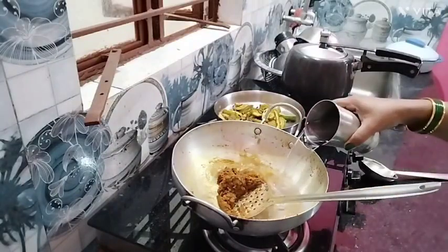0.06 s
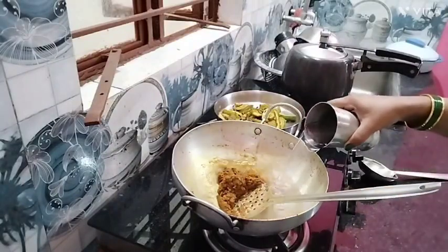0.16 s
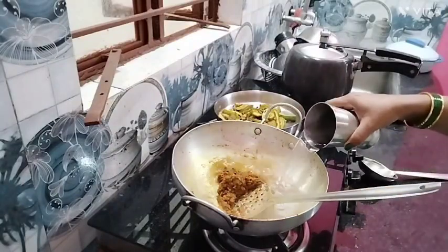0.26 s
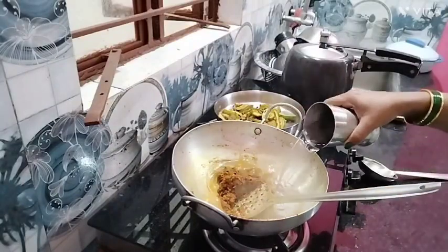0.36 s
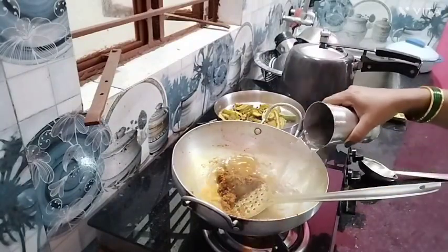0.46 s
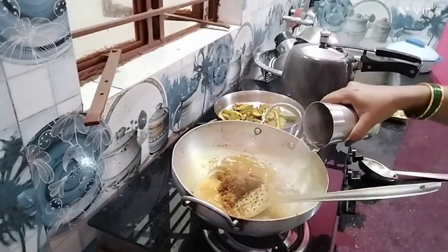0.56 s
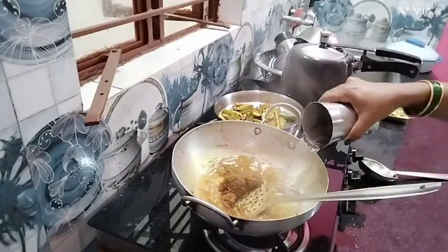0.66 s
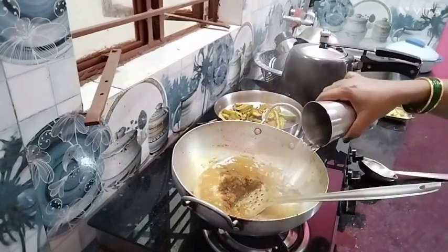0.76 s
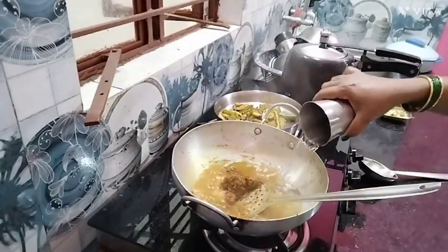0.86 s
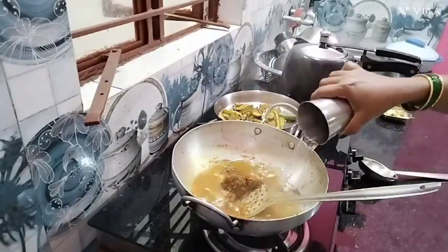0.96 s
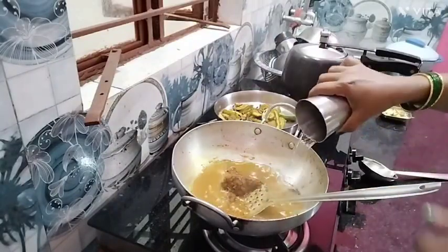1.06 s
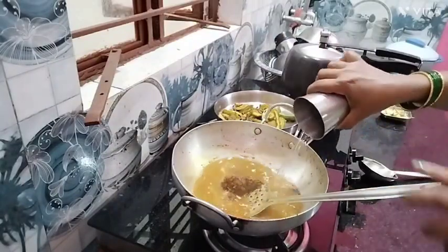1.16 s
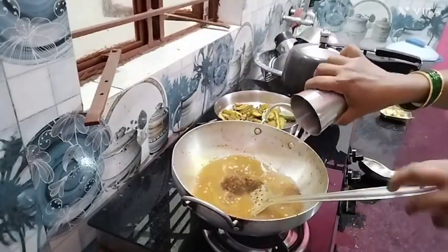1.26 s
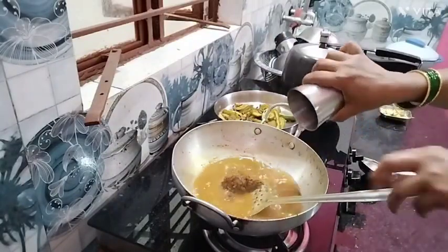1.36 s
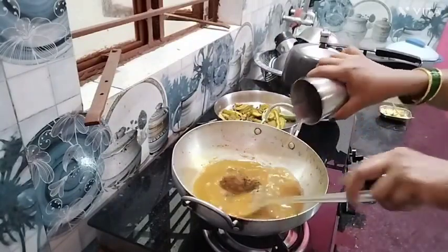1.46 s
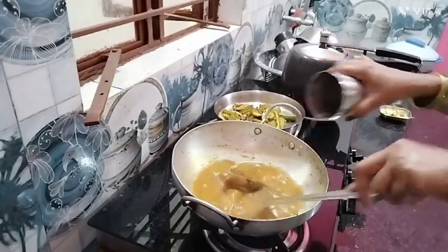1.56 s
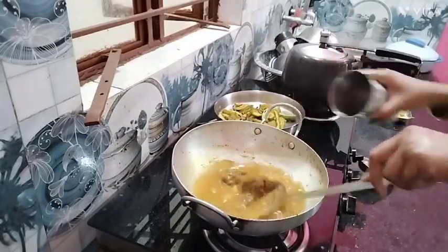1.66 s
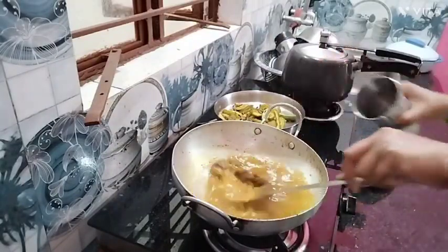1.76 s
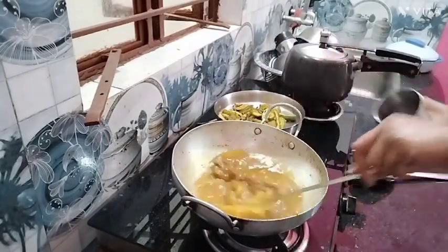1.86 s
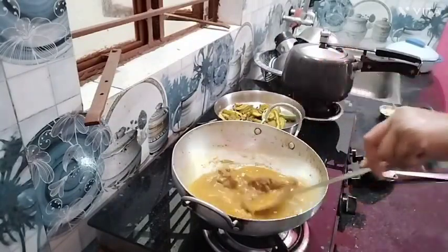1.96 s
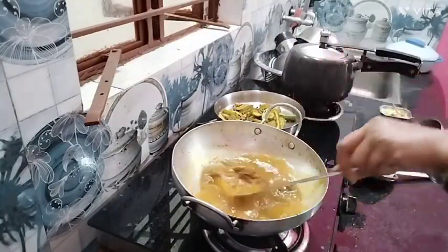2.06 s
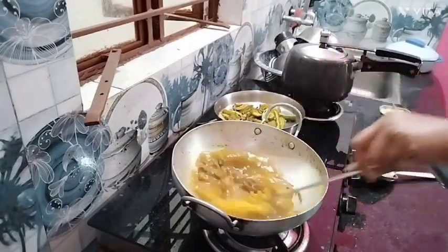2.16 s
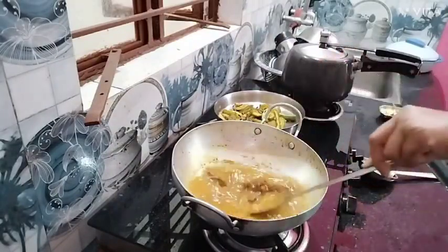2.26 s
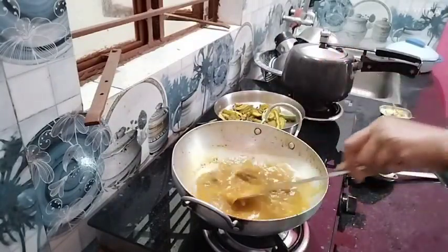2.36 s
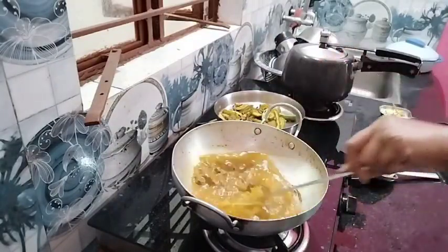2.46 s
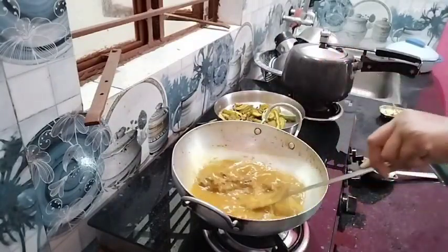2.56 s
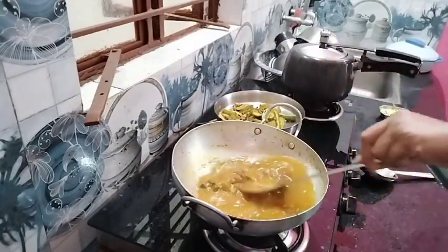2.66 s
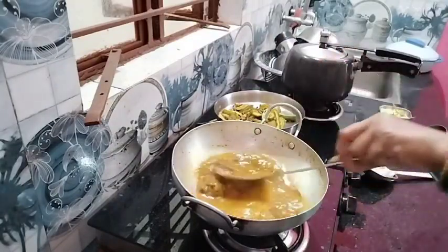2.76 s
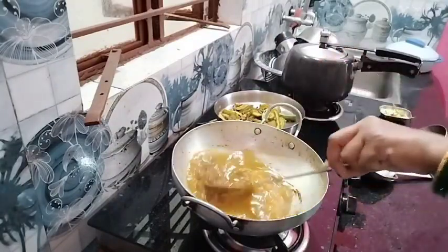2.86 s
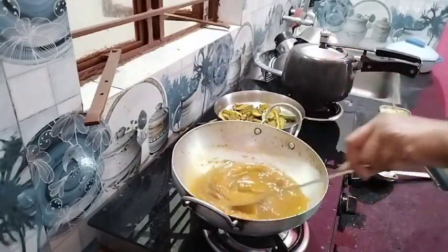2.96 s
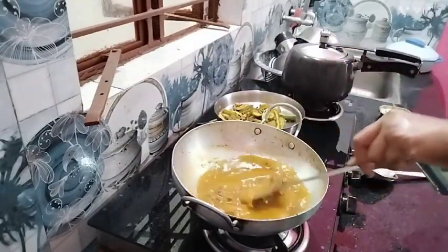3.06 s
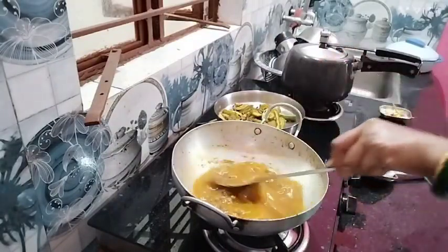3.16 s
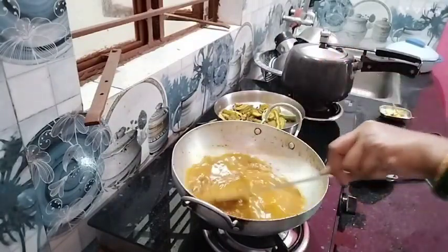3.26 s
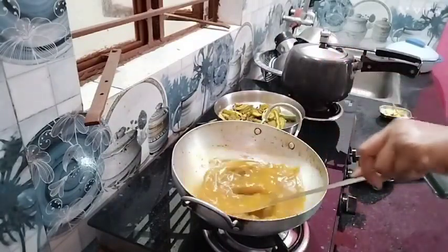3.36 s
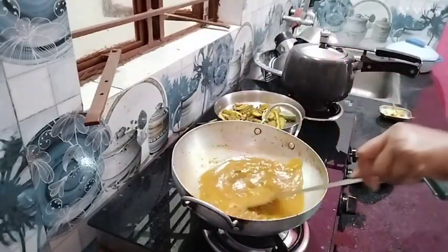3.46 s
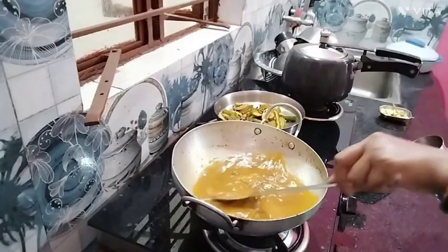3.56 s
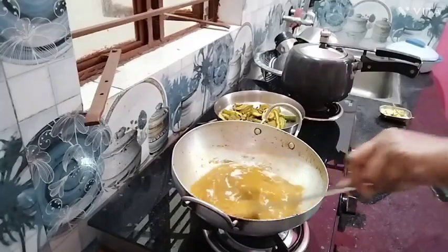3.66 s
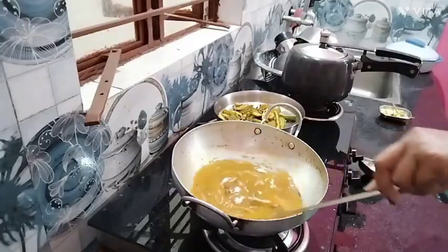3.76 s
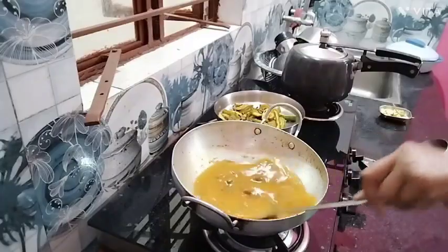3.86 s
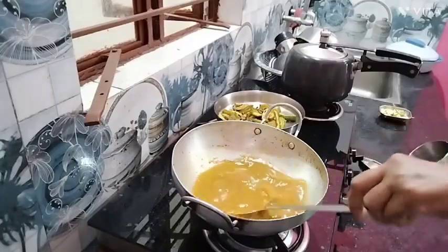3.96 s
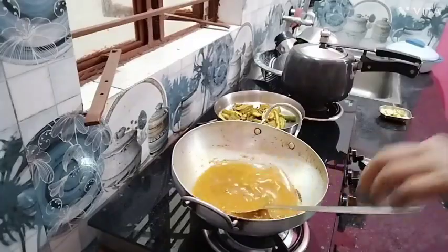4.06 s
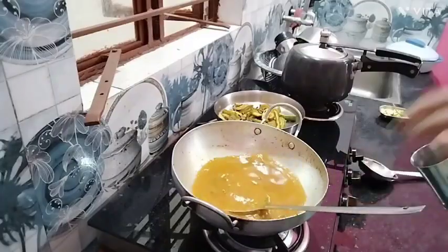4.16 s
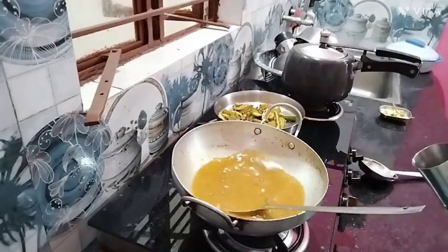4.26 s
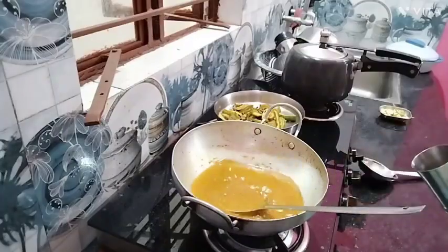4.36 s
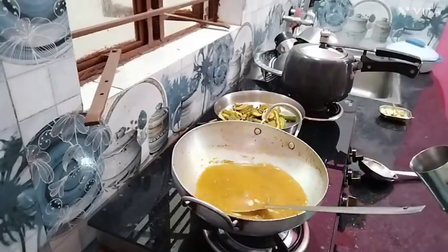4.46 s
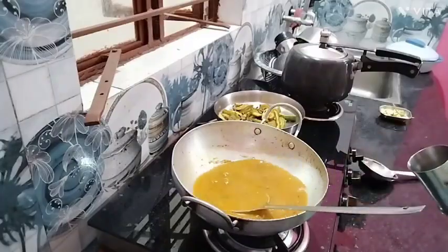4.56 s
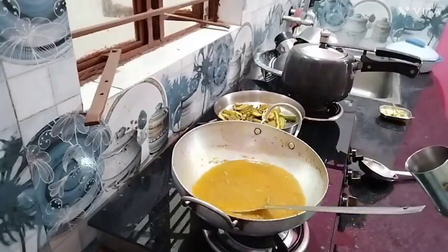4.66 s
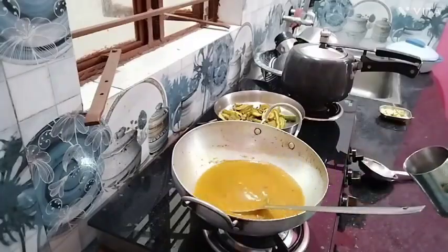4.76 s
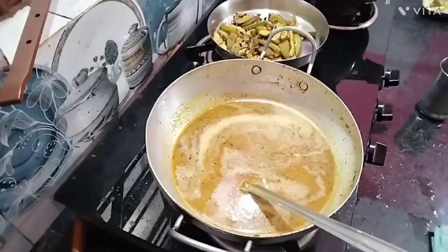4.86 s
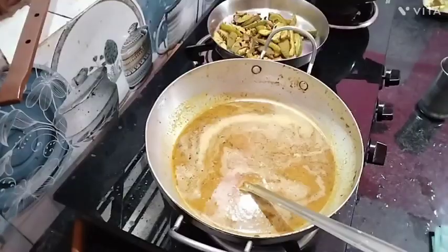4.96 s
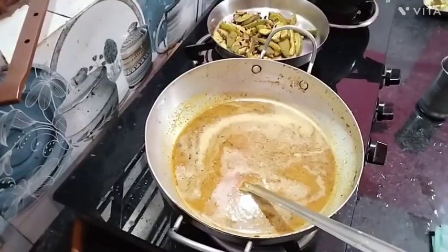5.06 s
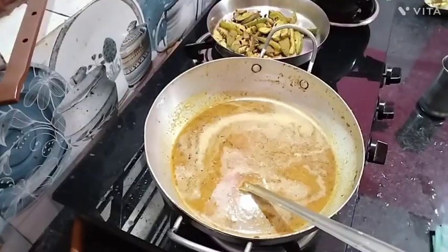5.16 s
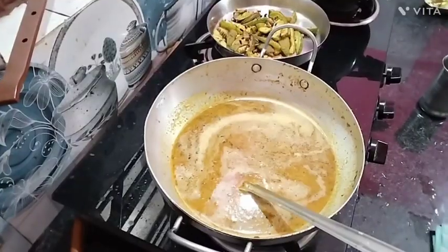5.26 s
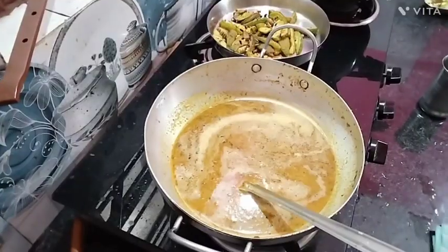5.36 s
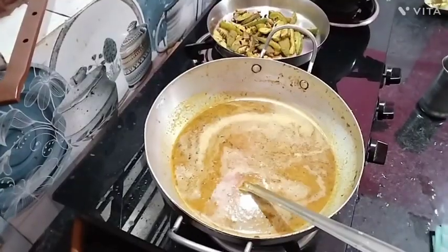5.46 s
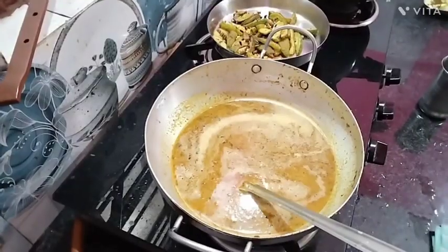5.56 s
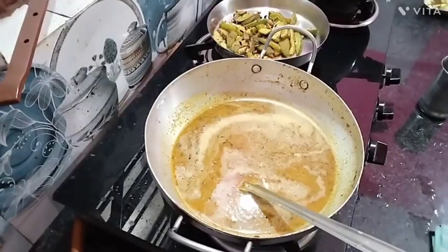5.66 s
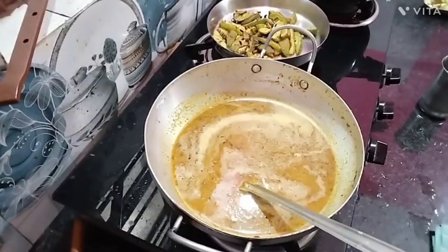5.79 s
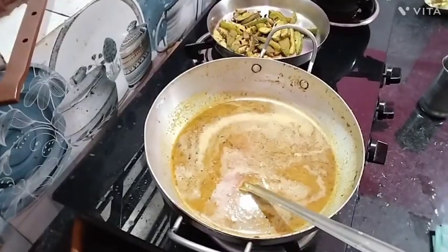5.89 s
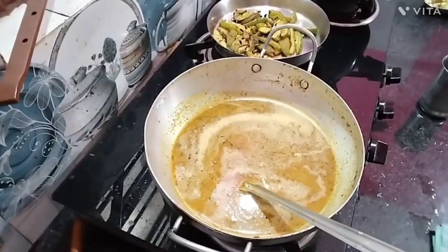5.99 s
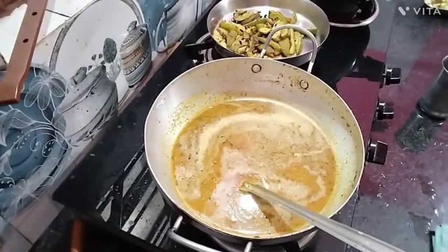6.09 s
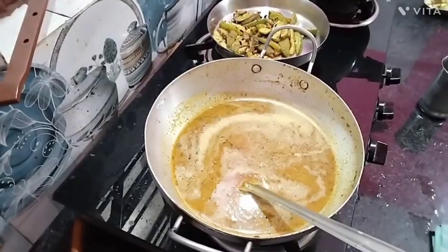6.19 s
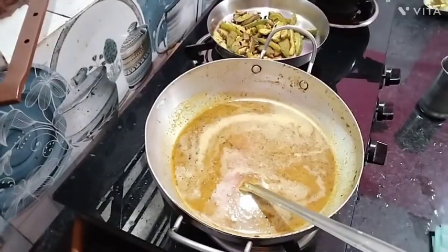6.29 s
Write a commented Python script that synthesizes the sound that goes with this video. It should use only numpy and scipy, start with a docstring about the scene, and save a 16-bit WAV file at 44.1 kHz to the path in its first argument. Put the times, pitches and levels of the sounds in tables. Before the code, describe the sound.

In a small tiled kitchen, water gushes onto fried spices in a hot metal pan with a loud, spitting sizzle that quickly drowns. A steel spoon then stirs the gravy with scrapes, plops and fresh hisses, and drops against the rim with a damped clank. Thin bubbling remains over flame rumble and faint hum; sound vanishes briefly, then returns. Close stereo microphone.

```python
"""Water is poured onto fried spices in a hot metal pan: countless vapour bursts make a loud sizzle that drowns as it fills.
A steel spoon stirs the gravy up the hot wall, where it hisses again, then is dropped against the rim: damped metal modes.
Bubbles sing thinly in a high band; short rings make plops, ticks and gurgles, and dull bumps and rumbles come from the pan.
The gas flame is shaped noise over a mains hum of two wavering tones, in a small tiled kitchen.
Near the end all sound cuts out for about 0.6 s."""
import sys
import numpy as np
from scipy import signal
from scipy.fft import rfft, irfft, next_fast_len
from scipy.io import wavfile

SR = 44100
rng = np.random.default_rng(int(sys.argv[2]) if len(sys.argv) > 2 else 0)


def dump(signal):
    """Clip the signal to [-1, 1] and save it as 16-bit WAV at the path in sys.argv[1]."""
    limited = np.clip(np.atleast_2d(signal).T, -1, 1)
    pcm = np.round(limited * 32767).astype(np.int16)
    wavfile.write(sys.argv[1], SR, pcm)


N = 279086
SIZE = next_fast_len(N, real=True)
TIME = np.arange(N) / SR                                        # s
BINS = np.maximum(np.arange(SIZE // 2 + 1) * SR / SIZE, 1)      # Hz

# how alike left and right are, high in the bass and where the pan itself rings:
# pitch_hz [Hz], likeness [-1 to 1]
LIKENESS = [(25, .7), (70, .96), (120, .98), (180, .8), (245, .88), (305, .6), (410, .8), (520, .45),
            (670, .55), (820, .1), (1200, -.1), (1700, .08), (2300, 0), (2700, .45), (3100, .08),
            (3550, .5), (4100, -.05), (5500, 0), (6650, 0), (7000, .72), (7350, .75), (7800, .2),
            (10500, .3), (15500, .15)]


def from_db(db):
    """Decibels to gain."""
    return 10 ** (np.asarray(db) / 20)


def rms_one(x):
    """Scale to an average strength (rms) of 1."""
    return x / np.sqrt(np.mean(x ** 2) + 1e-20)


def at_hz(points):
    """Read a table at every frequency, on a log axis."""
    hz, value = np.transpose(points)
    return np.interp(np.log(BINS), np.log(hz), value)


def shaped(x, gain):
    """Apply a gain per frequency."""
    return irfft(rfft(x, SIZE) * gain, SIZE)[..., :N]


def colour(x, spectrum, peaks=()):
    """Give a steady sound a broad spectrum with resonance peaks on it; rms 1."""
    db = at_hz(spectrum)
    for hz, width_hz, lift_db in peaks:
        db = db + lift_db / (1 + (2 * (BINS - hz) / width_hz) ** 2)
    return rms_one(shaped(x, from_db(db)))


def spread(pair):
    """Mix two unrelated sounds into left and right: alike in the bass, mostly more diffuse higher up."""
    alike = np.clip(at_hz(LIKENESS), -1, 1)
    mid, side = shaped(pair, np.sqrt([1 + alike, 1 - alike]))
    return np.array([mid + side, mid - side])


def butter(x, hz, kind, order=2):
    """Filter forward in time with a Butterworth filter."""
    sos = signal.butter(order, np.clip(hz, 10, .45 * SR), kind, fs=SR, output="sos")
    return signal.sosfilt(sos, x + 1e-18)


def drift(rate):
    """Smooth random wander of rms 1; a higher rate (Hz) wanders faster."""
    step = SR // 500
    pole = np.exp(-2 * np.pi * rate * step / SR)
    noise = rng.standard_normal(N // step + 502)
    slow = signal.lfilter([1], [1, -2 * pole, pole ** 2], noise)[500:]      # skip the settling
    return np.interp(np.arange(N) / step, np.arange(len(slow)), rms_one(slow))


def grains(per_s, spread_db):
    """Random clicks of uneven size and sign; rms 1."""
    sizes = from_db(spread_db * np.minimum(rng.exponential(1, N), 4))
    signs = rng.choice([-1, 1], N)
    return rms_one(sizes * signs * (rng.random(N) < per_s / SR))


def wide_grains(per_s, spread_db):
    """Two unrelated streams of clicks, spread over left and right."""
    return spread(np.array([grains(per_s, spread_db) for ear in range(2)]))


def dying(t, t60):
    """Envelope that starts at t = 0 and loses 60 dB in t60 (s)."""
    return (t >= 0) * from_db(-60 * np.clip(t / t60, 0, 4))


def burst(start_s, attack_s, hold_s, fall_db_per_s):
    """Envelope that swells smoothly to 1, holds and dies away."""
    age = TIME - start_s
    rise = np.sin(np.pi / 2 * np.clip(age / attack_s, 0, 1)) ** 2
    return rise * from_db(-fall_db_per_s * np.maximum(age - attack_s - hold_s, 0))


def swell(peak_s, half_s):
    """Bell-shaped envelope of a smooth movement."""
    return np.exp(-np.minimum(((TIME - peak_s) / half_s) ** 2, 20))


def kitchen(x, wet_db, wall_hz=9000):
    """Direct sound plus dense reflections off the tiles, which soften the treble above wall_hz."""
    t = TIME[:SR // 2]
    noise = butter(rng.standard_normal((2, len(t))), wall_hz, "low", order=1)
    tail = noise * dying(t - .003, t60=0.45)
    tail /= np.sqrt(np.sum(tail ** 2))
    echoes = signal.oaconvolve(x[None], tail, axes=1)[:, :N]
    return x + from_db(wet_db) * spread(echoes)


def boiling():
    """Strength of sizzle, fine spray and coarse boiling: each flares up and dies back to a simmer."""
    # liquid meets hot metal, four gushes from the cup, then four strokes of the spoon,
    # then a faint lingering fine hiss:
    # start_s [s], level_db [dB before the sizzle's gain], hold_s [s], fall_db_per_s [dB/s],
    # fine_db and coarse_db [dB relative to the sizzle]
    flares = [(-0.147, -31.5, 0.12, 24, -0.5, -3.5), (0.202, -36, 0.15, 48.5, -4.5, -3),
              (0.342, -36.5, 0.12, 51.5, -2, -8.5), (0.924, -53, 0.1, 27, 2, 1.5),
              (1.692, -42.5, 0.033, 74, -4, -7.5), (1.965, -38.5, 0.0041, 27, -1.5, -5),
              (2.647, -53, 0.027, 24.5, 2, -3), (3.0, -66, 0.11, 58, 6, 3),
              (3.723, -80.5, 0.16, 29.5, 9, -12)]
    # quiet simmer round the edge, sinking as the pan cools: time_s [s], level_db [dB before the sizzle's gain]
    simmer = [(0.8, -48), (1.65, -59), (3.4, -64.5), (3.8, -66.5), (4.6, -71), (5.4, -80)]
    # the sizzle flares quickly, the boiling takes longer, the spray comes first and lingers
    flare_s, build_s, spray_lead_s, spray_linger_s = 0.084, 0.28, 0.019, 0.03
    simmer_fine_db, simmer_coarse_db = -8.5, -3       # relative to the simmer

    time_s, level_db = np.transpose(simmer)
    simmering = from_db(np.interp(TIME, time_s, level_db))
    power = simmering ** 2 * from_db([[0], [simmer_fine_db], [simmer_coarse_db]]) ** 2
    for s, db, hold_s, fall, fine_db, coarse_db in flares:
        flare = from_db(db) * burst(s, flare_s, hold_s, fall)
        spray_shape = burst(s - spray_lead_s, flare_s + spray_lead_s, hold_s + spray_linger_s, fall)
        spray = from_db(db + fine_db) * spray_shape
        boil = from_db(coarse_db) * flare * np.sqrt(np.clip((TIME - s) / build_s, 0, 1))
        power += np.array([flare, spray, boil]) ** 2
    return np.sqrt(power)


def patches(x, depth_db, rate=16, count=12):
    """Each size of droplet comes and goes on its own, so bands swell and fade separately."""
    place = np.interp(np.sqrt(BINS), np.sqrt([1000, 15000]), [0, count - 1])
    spectrum = rfft(x, SIZE)
    out = 0
    for k in range(count):
        band = irfft(spectrum * np.maximum(1 - abs(place - k), 0), SIZE)[:, :N]
        out = out + band * from_db(depth_db * drift(rate))
    return out


def sizzle(strength, spray, boil, gain_db=3.0, flutter_db=.5, patchy_db=2.0):
    """Vapour bursts merge into a hiss, droplets spit; a thin film hisses high, deeper water boils lower."""
    # broad colour of the sizzle: pitch_hz [Hz], level_db [dB per Hz]
    sizzle_colour = [(120, -17.5), (220, -8), (380, -25), (520, -13.5), (850, -8.5), (1200, -4),
                     (2200, 1.1), (3300, -6), (4600, -2.5), (6200, -2), (7600, -1), (8900, -8),
                     (11200, -4.5), (15500, -4.5)]
    # resonances that change its colour: pitch_hz [Hz], width_hz [Hz], lift_db [dB]
    sizzle_peaks = [(854, 120, 10), (2750, 76, 1.5), (3366, 640, 6), (3765, 190, 4), (5050, 70, -0.5),
                    (6100, 60, 2), (7000, 450, 1.5), (11060, 1100, 3)]
    bursts_per_s, spits_per_s, spit_db = 9000, 200, -8
    boil_hz, spray_hz = 4200, 8300

    bursts = wide_grains(bursts_per_s, spread_db=1.0)
    sparse = np.interp(strength, from_db([-42, -34]), [1, .5])      # single spits drown in the full roar
    spits = from_db(spit_db) * sparse * grains(spits_per_s, spread_db=-0.5)
    centre = grains(bursts_per_s, spread_db=2) + spits
    hot_spot = rms_one(kitchen(centre, wet_db=8, wall_hz=16000))
    hiss = colour(patches(bursts + hot_spot, patchy_db), sizzle_colour, sizzle_peaks)

    fine = 1 / (1 + (spray_hz / BINS) ** 16)      # share of the smallest droplets
    coarse = 1 / (1 + (BINS / boil_hz) ** 8)      # share of the largest bubbles
    middle_part = strength * rms_one(shaped(hiss, 1 - fine - coarse))
    fine_part = spray * rms_one(shaped(hiss, fine))
    coarse_part = boil * rms_one(shaped(hiss, coarse))
    return (middle_part + fine_part + coarse_part) * from_db(gain_db + flutter_db * drift(55))


def surge(peak_s=0.307, half_s=0.06, level_db=-34, pitch_hz=3300, width_hz=1000):
    """As the second gush lands, the boiling briefly swells around one pitch."""
    boil = wide_grains(5000, spread_db=2)
    band = rms_one(butter(boil, [pitch_hz - width_hz / 2, pitch_hz + width_hz / 2], "band"))
    return band * from_db(level_db) * swell(peak_s, half_s)


def crackle(strength, per_s=110, level_db=-11, cycles=30, low_hz=2400, high_hz=12000, count=16):
    """Lone droplets pop on the hot wall at scattered pitches; they stand out once the roar has sunk."""
    t = TIME[:SR // 50]
    pops = 0
    for hz in np.geomspace(low_hz, high_hz, count):
        pop = np.sin(2 * np.pi * hz * t) * dying(t, cycles / hz)
        pops = pops + signal.oaconvolve(grains(per_s / count, spread_db=1.5), pop)[:N]
    limited = np.minimum(strength, from_db(-35.0))      # no louder in the full roar
    return kitchen(rms_one(pops) * limited * from_db(level_db), wet_db=-7)


def gurgle(boil, per_s=70, level_db=-16, cycles=22, low_hz=480, high_hz=2200, count=12):
    """Air and steam caught in the liquid ring as small bubbles, more loudly while it boils hard."""
    t = TIME[:SR // 10]
    rings = 0
    for hz in np.geomspace(low_hz, high_hz, count):
        bubble = np.sin(2 * np.pi * hz * t * (1 + 0.55 * t)) * dying(t, cycles / hz)      # pitch rises
        rings = rings + signal.oaconvolve(grains(per_s / count, spread_db=-1.5), bubble)[:N]
    return kitchen(rms_one(rings) * boil * from_db(level_db), wet_db=0.5)


def singing(gain_db=1, flutter_db=2.0, width_hz=230):
    """Like-sized bubbles collapse on the pan floor in a high band; swarms grow fast and thin out slowly."""
    # swarms of tiny vapour bubbles: peak_s [s], level_db [dB before the gain],
    # pitch_hz, pitch raised or lowered in level [Hz], lift_db, change at that pitch [dB]
    swarms = [(3.25, -57.5, 7250, -3), (3.87, -60.5, 7000, 6), (4.23, -62.5, 7120, 2),
              (4.49, -77, 7000, 11), (4.57, -50.5, 7060, 13), (5.53, -60, 6600, 0.5), (5.85, -65, 6750, 5),
              (6.16, -59, 6500, 1)]
    # colour of the swarms: pitch_hz [Hz], level_db [dB per Hz]
    singing_colour = [(5000, -39.5), (5800, -32), (6200, -9), (6600, -5), (6880, -2), (7060, -2),
                      (7250, -4), (7600, -24.5), (8100, -17), (8700, -60), (12000, -65)]
    rise_db_per_s, fall_db_per_s = 155, 65
    # once the gravy is warm, a faint singing goes on between the swarms
    warm_s, warming_s, bed_db = 2.5, 0.45, -72.5

    swarm = wide_grains(15000, spread_db=2)
    warmth = np.clip((TIME - warm_s) / warming_s, 0, 1)
    out = colour(swarm, singing_colour) * from_db(bed_db) * warmth
    for s, db, hz, lift_db in swarms:
        bubbles = np.roll(swarm, rng.integers(N), axis=1)
        drop_db = np.maximum(rise_db_per_s * (s - TIME), fall_db_per_s * (TIME - s))
        sung = colour(bubbles, singing_colour, [(hz, width_hz, lift_db)])
        out = out + sung * from_db(db - drop_db)
    return out * from_db(gain_db + flutter_db * drift(24))


def stirring():
    """How hard the spoon rasps and how strongly its bowl rings; both swell and fade with each stroke."""
    # strokes over the pan floor: peak_s [s], half_s, half length [s],
    # rasp_db [dB], ring_db of the bowl [dB before the level of each resonance]
    strokes = [(1.805, 0.26, -57.5, -57), (2.6, 0.94, -69, -72), (3.17, 0.32, -78, -57),
               (3.52, 0.066, -71, -60.5), (3.824, 0.048, -58, -82), (4.06, 0.064, -74, -80.5)]
    return sum(from_db([[rasp_db], [ring_db]]) * swell(s, half_s) for s, half_s, rasp_db, ring_db in strokes)


def pan_ring(bright_hz, damping, split=0.02, count=5):
    """One contact: a crack and clusters of beating modes, shortened by gravy and roughened by spoon chatter."""
    # modes of spoon and pan: pitch_hz, centre of the cluster [Hz], level_db [dB, relative],
    # t60_s, time to lose 60 dB before the gravy damps it [s]
    pan_modes = [(443, 16.5, 0.32), (728, 6, .2), (1320, -1.5, 0.21), (2077, 0, 0.41), (2180, -1, 0.25),
                 (2295, -2.5, 0.23), (2440, 0.5, .15), (3310, 5, 0.088), (3540, -3, 0.081),
                 (3830, -1, 0.098), (4270, -7, 0.15), (5370, -0.5, .18), (5830, 3.5, 0.21), (6150, 4, 0.16),
                 (6100, -11, .18), (6910, -0.5, 0.15), (7130, -3, 0.15), (7340, 2.5, 0.19),
                 (8000, 2, 0.079), (10800, -1, .08)]
    crack_db, crack_t60, chatter_db, chatter_t60 = -16, 0.009, -26, 0.036      # dB, s, dB, s
    t = TIME[:SR // 2]

    hz, db, t60 = np.repeat(pan_modes, count, axis=0).T[:, :, None]
    places = np.tile(np.linspace(-1, 1, count), len(pan_modes))[:, None]
    hz = hz * (1 + split * (places + rng.uniform(-0.82, 1, hz.shape) / count))
    favour = 1 / (1 + np.log2(hz / bright_hz) ** 2)      # pitches near bright_hz ring most
    strength = from_db(db + rng.normal(0, 1, hz.shape)) * favour / np.sqrt(count)
    waves = np.sin(2 * np.pi * hz * t) * rng.choice([-1, 1], hz.shape)
    modes = strength * waves * dying(t, t60 * np.clip(1 - damping, .025, 1))

    chatter = from_db(chatter_db) * rng.standard_normal(len(t)) * dying(t, chatter_t60)
    contact = (t == 0) + chatter
    ring = signal.fftconvolve(modes.sum(axis=0), contact)[:len(t)]
    crack_noise = butter(rng.standard_normal(len(t)), [bright_hz / 0.92, bright_hz * 2.5], "band")
    crack = rms_one(crack_noise) * dying(t, crack_t60)
    return from_db(-15.5) * ring + from_db(crack_db) * crack


def spoon(rasping, slips_per_s=2600, uneven_db=2, snap_hz=5000, snap_t60=0.0257, wet_db=-2):
    """The spoon knocks on the pan with a bright snap of bare metal, and rasps over its floor in quick slips."""
    # spoon on pan: start_s [s], level_db [dB], bright_hz, brightest pitch [Hz],
    # damping by the gravy [0-1], snap_db of bare metal [dB relative to the knock]
    knocks = [(2.598, -33.5, 3000, 0.93, -30), (3.041, -36.5, 5000, 0.95, -24),
              (3.382, -47, 5500, 0.93, -25), (3.514, -44, 4500, 0.73, -18), (3.58, -47, 3580, 0.6, -24),
              (3.699, -27, 1820, 1, -27), (3.7886, -30, 3730, 0.91, -26.5),
              (4.001, -20.5, 3300, 0.84, -21.5), (4.006, -30.5, 2300, 0.55, -24),
              (4.021, -41.5, 5500, 0.9, -24), (4.035, -31.5, 4020, 0.91, -18)]
    # colour of the rasp: pitch_hz [Hz], level_db [dB per Hz]
    rasp_colour = [(200, -13), (500, -2), (1200, 4), (2600, -5), (4500, -5.5), (7500, -8.5), (9000, -20),
                   (15000, -20)]
    out, t = np.zeros(N), TIME[:SR // 2]
    for s, db, bright_hz, damping, snap_db in knocks:
        snap = rms_one(butter(rng.standard_normal(len(t)), snap_hz, "high", order=1)) * dying(t, snap_t60)
        at = round(s * SR)
        out[at:at + len(t)] += from_db(db) * (pan_ring(bright_hz, damping) + from_db(snap_db) * snap)
    rasp = colour(grains(slips_per_s, spread_db=4.5), rasp_colour)
    out += rasp * rasping * from_db(uneven_db * drift(7.1))
    return kitchen(out, wet_db)


def rubbing(ringing, flicker_db=4.0):
    """Uneven friction keeps two resonances of the spoon's bowl alive."""
    # resonances of the bowl: pitch_hz [Hz], width_hz [Hz], level_db [dB, relative]
    rub_modes = [(3815, 350, -8.5), (10900, 400, -6.5)]
    friction = wide_grains(500, spread_db=3)
    rings = 0
    for hz, width_hz, db in rub_modes:
        band = rms_one(butter(friction, [hz - width_hz / 2, hz + width_hz / 2], "band"))
        rings = rings + band * from_db(db + flicker_db * drift(25))
    return rings * ringing


def plops(cycles=40, rise_per_s=0.52, attack_s=0.0017, snap_db=-14, snap_t60=0.038):
    """Low plops and high ticks: each is a snap of noise with a brief ring that rises in pitch."""
    # short ringing plops and high ticks: start_s [s], level_db of the ring before it dies [dB],
    # pitch_hz at the start [Hz]
    plops_and_ticks = [(1.625, -34, 993), (2.283, -26, 3430), (2.588, -38, 3070), (2.598, -44, 1700),
                       (3.030, -42, 8400), (3.074, -32, 8160), (3.170, -30, 5350), (3.381, -41, 1530),
                       (3.513, -39, 11100), (3.699, -38, 1020), (3.704, -40.5, 1220), (3.722, -43, 1110),
                       (3.974, -47, 3680), (4.235, -48, 10600)]
    out, t = np.zeros(N), TIME[:SR // 5]
    for s, db, hz in plops_and_ticks:
        wave = np.sin(2 * np.pi * hz * t * (1 + rise_per_s * t))      # pitch climbs at twice rise_per_s
        ring = wave * dying(t, attack_s + cycles / hz) * np.minimum(t / attack_s, 1)
        snap_noise = butter(rng.standard_normal(len(t)), [hz / 1.3, hz * 1.2], "band")
        snap = rms_one(snap_noise) * dying(t, snap_t60)
        at = round(s * SR)
        out[at:at + len(t)] += from_db(db) * (ring + from_db(snap_db) * snap)
    return kitchen(out, wet_db=-6)


def bumps(low_hz=95, rise_s=0.0029, slap_db=-24, thud_db=4, thud_cycles=5, thud_top_hz=170, body_t60=0.069):
    """Soft blows thud and shake the many low modes of pan and stove, with a faint slap above them."""
    # dull bumps of pan and stove: start_s [s], level_db [dB], edge_hz, upper edge of the body [Hz]
    blows = [(0.592, -31, 250), (0.718, -31.5, 142), (1.447, -30.5, 160), (1.583, -33, 155),
             (1.62, -36.5, 172), (2.472, -31, 173.4), (2.558, -34, 200), (3.516, -38.5, 200),
             (3.831, -33, 213), (4.003, -46, 520), (4.04, -34.5, 630), (4.5, -26.5, 165)]
    out, t = np.zeros(N), TIME[:SR // 2]
    for s, db, edge_hz in blows:
        push = butter(rng.standard_normal(SR), low_hz, "high")
        slap = from_db(slap_db) * butter(push, edge_hz * 4.1, "low")
        body = butter(push, edge_hz, "low", order=6) + slap
        shake = rms_one(body[-len(t):]) * dying(t, body_t60)
        thud_hz = min(0.69 * edge_hz, thud_top_hz)
        thud = from_db(thud_db) * np.sin(2 * np.pi * thud_hz * t) * dying(t, thud_cycles / thud_hz)
        hit = from_db(db) * (thud + shake) * (1 - np.exp(-t / rise_s))
        at = round(s * SR)
        out[at:at + len(t)] += hit[:N - at]
    return kitchen(out, wet_db=-6.0)


def rocking():
    """Stirred gravy rocks the pan with a low rumble; the first shove makes it judder in uneven knocks."""
    # the gravy sloshes: peak_s [s], level_db [dB]
    sloshes = [(2.62, -43), (2.98, -41), (3.35, -45.5), (3.98, -43.5), (4.51, -44), (6.182, -44.5)]
    # colours of the rumble and of the shove: pitch_hz [Hz], level_db [dB per Hz]
    rocking_colour = [(20, -4), (45, -10.5), (85, 10.5), (125, -12), (200, -28), (600, -72)]
    shove_colour = [(60, -17.5), (130, 11), (200, -9), (320, 2.5), (600, -14.5), (1050, -16.5),
                    (1400, -20.5), (2800, -22.5), (6000, -46)]
    # resonances that the shove excites: pitch_hz [Hz], width_hz [Hz], lift_db [dB]
    shove_peaks = [(950, 165, 7.5), (1700, 300, 3.5), (2710, 220, 3.5)]
    shove_db, knocks_per_s = -35.5, 840

    churn = spread(rng.standard_normal((2, N)))
    sloshing = sum(from_db(db) * swell(s, half_s=0.19) for s, db in sloshes)
    rumble = colour(churn, rocking_colour) * sloshing
    judder = kitchen(grains(knocks_per_s, spread_db=1.5), wet_db=-0.5)
    push = from_db(shove_db) * burst(start_s=1.545, attack_s=0.084, hold_s=0.015, fall_db_per_s=114)
    return rumble + colour(judder, shove_colour, shove_peaks) * push


def flame(level_db=-44.0, flicker_db=0.96):
    """Turbulent rumble of the burner: shaped noise whose level flickers."""
    # colour of the gas flame: pitch_hz [Hz], level_db [dB per Hz]
    flame_colour = [(20, -7), (40, -14.5), (62, -5), (84, 4), (108, -4), (135, -2), (195, -14.5),
                    (430, -10.5), (900, -16), (1300, -22), (2500, -30.5), (5000, -49.5), (9000, -66.5),
                    (15800, -66.5)]
    # room resonances it fills: pitch_hz [Hz], width_hz [Hz], lift_db [dB]
    room_peaks = [(118, 81, 4.8), (248.2, 20, 11.2), (293.7, 12, 6.7), (475, 42, 0.87), (924, 100, 4.9)]
    roar = colour(spread(rng.standard_normal((2, N))), flame_colour, room_peaks)
    return roar * from_db(level_db + flicker_db * drift(rate=20.0))


def hum(waver_db=2.0, waver_rad=0.3):
    """A slightly wavering mains hum."""
    # tones of the hum: pitch_hz [Hz], level_db [dB rms before the waver]
    hum_tones = [(100, -44.5), (300, -60)]
    phase = waver_rad * drift(rate=2.1)
    out = 0
    for hz, db in hum_tones:
        level = np.sqrt(2) * from_db(db + waver_db * drift(2.7))
        out = out + level * np.sin(2 * np.pi * hz * TIME + phase)
    return out


def scene():
    """Everything at the stove."""
    strength, spray, boil = boiling()
    rasping, ringing = stirring()
    water = sizzle(strength, spray, boil) + surge() + crackle(strength) + gurgle(boil) + singing()
    stirred = spoon(rasping) + rubbing(ringing) + plops() + bumps() + rocking()
    return water + stirred + flame() + hum()


def record(dry):
    """Left and right differ slightly in tone, the sound drops out once, and the top is cut."""
    # the two microphone ports hear the stove differently: pitch_hz [Hz], balance_db, left minus right [dB]
    port_balance = [(30, 3.5), (80, 0), (200, 1), (380, -1.5), (800, -0.3), (2400, -0.3), (4400, -0.5),
                    (8100, 1), (15000, 1.5)]
    # the dropout: start_s [s], end_s [s]
    silence = (4.7767, 5.3735)
    cutoff_hz = 15800
    heard = shaped(dry, from_db(at_hz(port_balance) * np.array([[.5], [-.5]])))
    running = (TIME < silence[0]) | (TIME > silence[1])
    top_cut = signal.ellip(12, .1, 80, cutoff_hz, fs=SR, output="sos")
    return signal.sosfilt(top_cut, heard * running)


dry = scene()
out = record(dry)
dump(out)
```